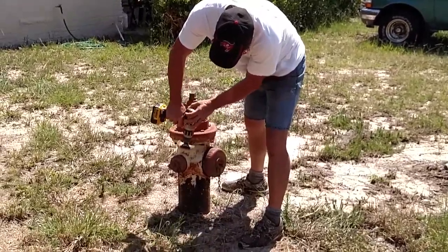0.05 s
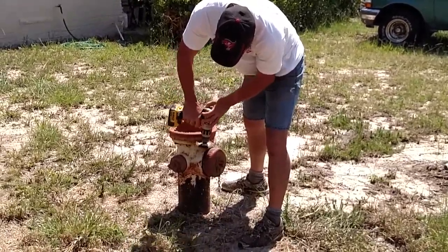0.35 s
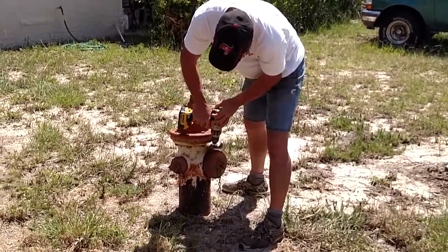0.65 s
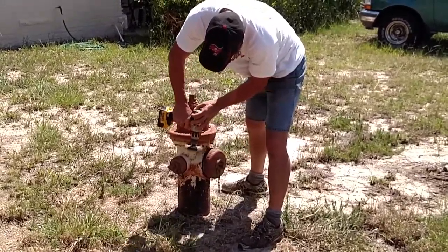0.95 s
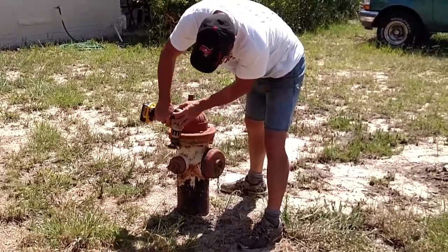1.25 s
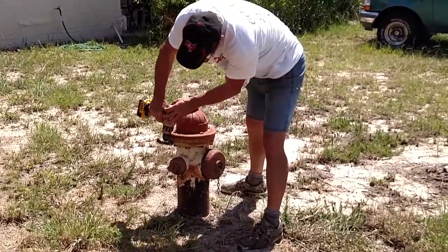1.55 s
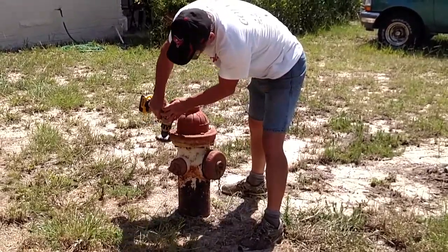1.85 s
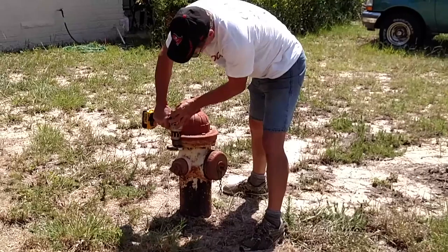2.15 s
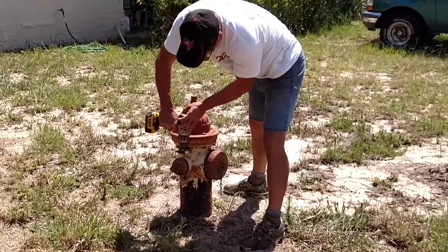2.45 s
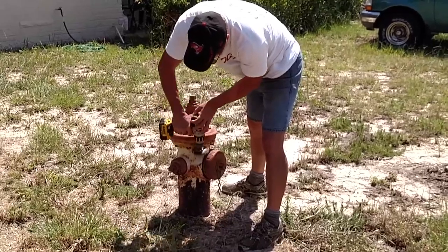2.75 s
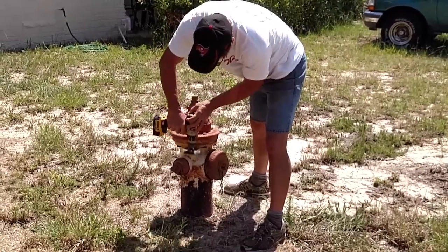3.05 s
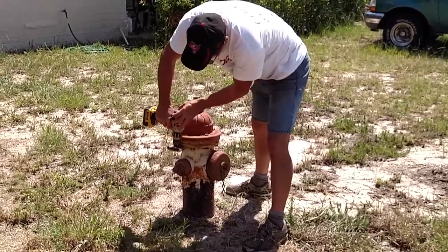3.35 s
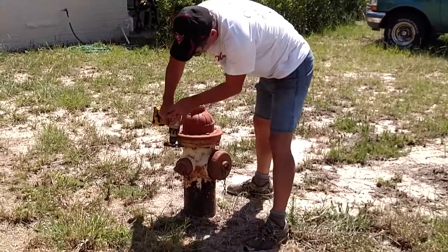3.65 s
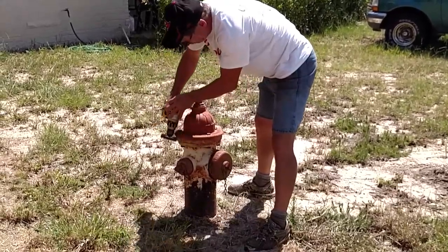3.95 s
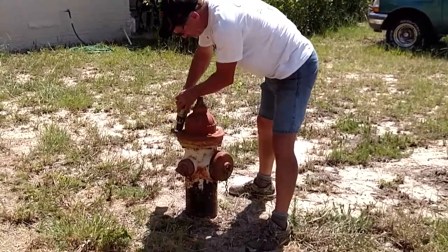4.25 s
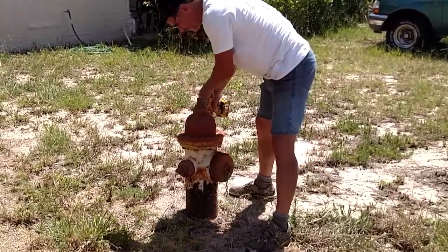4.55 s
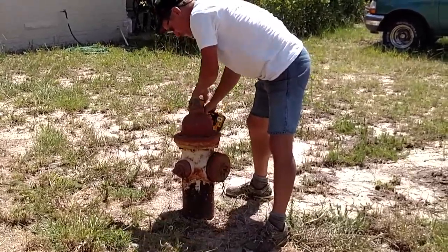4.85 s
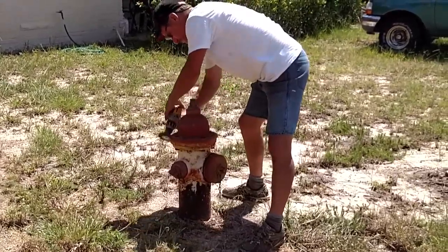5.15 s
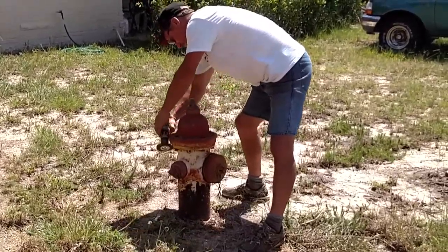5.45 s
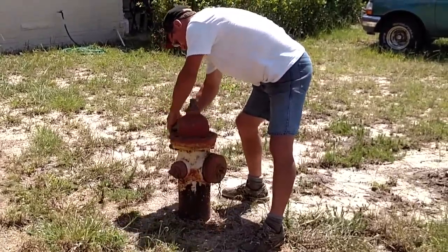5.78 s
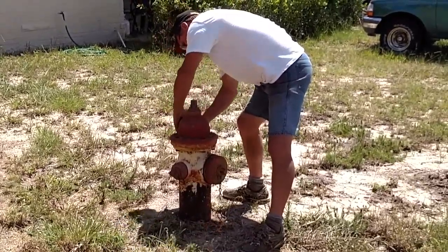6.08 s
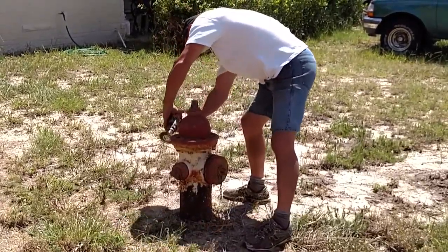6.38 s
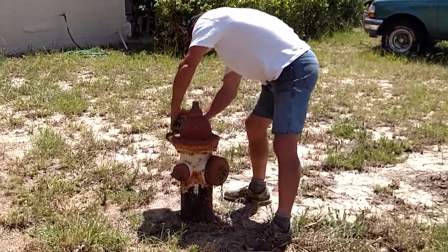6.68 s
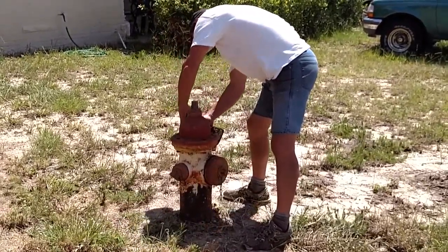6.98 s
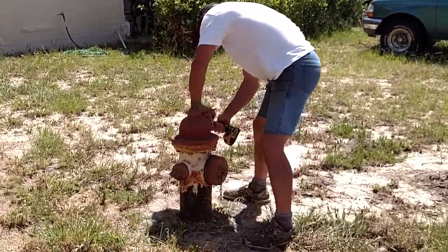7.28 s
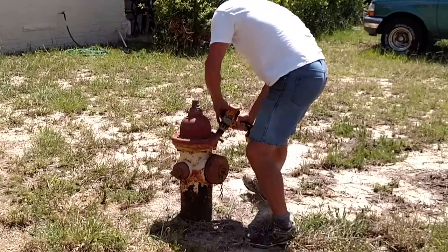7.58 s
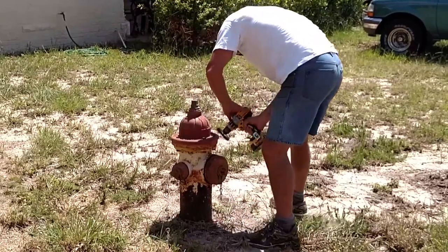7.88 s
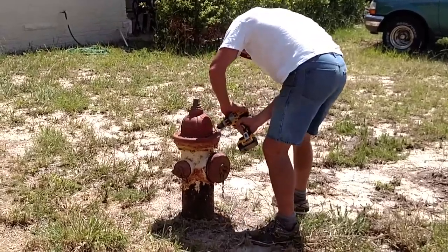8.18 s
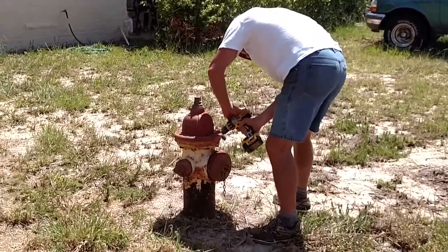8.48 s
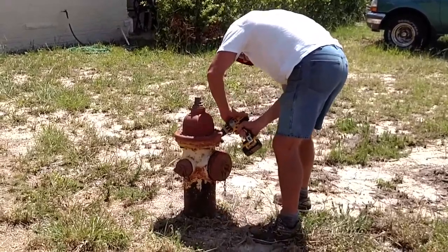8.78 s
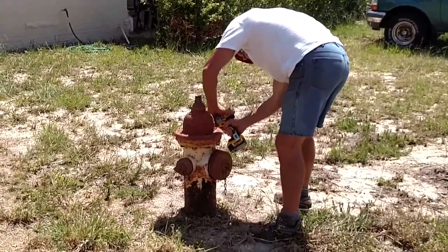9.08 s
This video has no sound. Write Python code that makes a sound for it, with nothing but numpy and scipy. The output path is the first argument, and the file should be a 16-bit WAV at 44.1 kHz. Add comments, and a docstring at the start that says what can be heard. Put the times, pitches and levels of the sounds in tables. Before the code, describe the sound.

Outdoors, a spinning wire brush rasps and hisses on a metal hydrant over a wavering drill whine and gusty wind thumps.

```python
"""On a lawn, one microphone, a few metres from a cordless drill wire-brushing a rusty cast-iron hydrant.
From the start the wires scrub, hiss and sing on the front of the cap; the whine sags under pressure.
Around 2 s the wires squeal twice on an edge, and once more near 4 s. From about 3.5 to 5 s the wind
buffets the microphone hardest, while the brush works round to the back. Near 8 s it moves to the side
and lifts, so the motor speeds up; then it is pressed on again until the end, at about 9 s."""
import sys
import numpy as np
from scipy import signal
from scipy.fft import rfft, irfft, next_fast_len
from scipy.io import wavfile
from scipy.ndimage import uniform_filter1d, map_coordinates

SR = 44100
rng = np.random.default_rng(int(sys.argv[2]) if len(sys.argv) > 2 else 0)


def wrap_up_sound(samples):
    """Save the sound to the file named by the first command line argument, as 16-bit audio."""
    columns = np.atleast_2d(samples).T
    # keep every value between -1 and 1, then stretch to whole-number steps
    tamed = np.clip(columns, -1, 1)
    steps = np.round(tamed * 32767).astype(np.int16)
    wavfile.write(sys.argv[1], SR, steps)


N = 402633

# spectra of still air over the lawn, wind rumble and an eddy's tearing wash: f/Hz, relative level/dB
AIR_SPECTRUM = [(20, 19.5), (100, -19), (250, 0), (500, -2), (1200, -14), (6000, -43)]
RUMBLE_SPECTRUM = [(10, -22), (22, -1), (70, 1.5), (115, -8), (160, -11.5), (250, -24.5), (400, -49),
                   (900, -70)]
TEAR_SPECTRUM = [(60, 1), (150, 7.5), (250, -6.5), (400, -10.5), (620, -26.5), (1500, -32), (4000, -62),
                 (12000, -90)]
# wind rumble at the microphone: t/s, level/dB
WIND_LEVEL = [(0, -32), (.6, -34.5), (1, -42.5), (1.4, -28.5), (1.8, -43.5), (2.05, -31.5), (3.1, -45),
              (3.45, -36), (4.05, -28), (4.3, -37.5), (4.45, -20.5), (4.88, -25), (5.1, -37), (5.8, -37),
              (6.35, -45.5), (6.85, -40.5), (7.2, -26), (7.65, -48), (8.0, -44), (8.55, -53.5),
              (8.85, -33.5), (9.13, -49)]
# the hardest eddies to strike the microphone: t/s, peak level/dB, flutter f/Hz, length/s
HARD_EDDIES = [(.215, -19.5, 134, .015), (.288, -19.5, 118, .023), (.389, -12.5, 114, 0.011),
               (1.256, -22.5, 118, .016), (1.535, -17.5, 120, 0.011), (2.008, -14.5, 133, 0.0071),
               (2.098, -16, 128, 0.019), (2.314, -15, 114, .015), (2.528, -23, 109, 0.019),
               (3.434, -7.5, 127.5, 0.013), (3.628, -18.5, 120, 0.02), (3.669, -11.5, 137, 0.0058),
               (3.87, -17, 126, .019), (3.971, -12, 108, .014), (4.039, -5.5, 165, 0.022),
               (4.092, -2, 153.3, 0.019), (4.249, -16, 134, 0.0094), (4.489, -11.5, 121, .024),
               (4.568, -13, 121, 0.031), (4.677, -10, 159, 0.058), (4.711, -12.5, 178, 0.016),
               (4.808, -15, 107, 0.036), (4.862, -4.5, 149, 0.011), (4.982, -10, 185, 0.02),
               (5.239, -22, 106, .014), (5.292, -16.5, 130, 0.012), (5.645, -19.5, 73, 0.01),
               (5.828, -15, 198, 0.025), (5.865, -17, 137, 0.014), (6.472, -22, 98, 0.0093),
               (7.072, -13, 134, 0.0056), (7.134, -14, 78, 0.013), (7.272, -6, 118, 0.0067),
               (7.488, -20, 120, 0.011)]
# the whine sinks as the brush is pressed on and recovers as it is lifted: t/s, f/Hz
WHINE_PITCH = [(0, 1335), (.5, 1319), (.84, 1366), (1.38, 1277), (1.76, 1366), (1.95, 1332), (2.2, 1412),
               (2.48, 1288), (2.6, 1272), (2.83, 1385), (3.15, 1350), (3.49, 1353), (3.7, 1425),
               (3.93, 1444), (4.2, 1365), (4.49, 1322), (4.64, 1377), (4.8, 1390), (5.02, 1355),
               (5.25, 1365), (5.59, 1359), (5.76, 1298), (5.94, 1379), (6.12, 1343), (6.24, 1435),
               (6.32, 1447), (6.65, 1333), (6.92, 1286), (7.36, 1258), (7.72, 1279), (7.88, 1431),
               (8.12, 1443), (8.23, 1398), (8.39, 1443), (8.5, 1350), (8.6, 1366), (8.73, 1299),
               (9.13, 1296)]
# the drill beams its two tones differently as it is turned: t/s, whine level/dB, octave level/dB
WHINE_LEVELS = [(0, -49, -46.5), (.9, -51.5, -45.5), (1.45, -41.5, -45), (1.95, -49, -38), (2.36, -49, -51),
                (2.58, -43, -37.5), (2.76, -55, -49), (3.45, -49, -54), (3.72, -42, -37.5),
                (4.0, -41.5, -42), (4.25, -53, -55), (4.48, -51, -42), (4.59, -49, -49), (4.76, -55, -39),
                (5.25, -56, -43.5), (5.45, -58, -56), (5.7, -63, -41), (5.9, -51, -48), (6.28, -47, -39),
                (6.48, -63, -44), (6.72, -49, -42), (7.25, -46.5, -52.5), (7.72, -48, -38),
                (8.02, -41.5, -45.5), (8.25, -37, -55), (8.7, -43, -43), (9.13, -45, -47)]
# upper motor and gear lines: multiple of the whine, free-running level over it/dB, full-load change/dB
GEAR_LINES = [(1.81, -25, 19), (3, -20, 2), (3.4, -22, 15), (4.001, -6.5, -8), (5.001, -20, 7),
              (5.753, -12, -4)]
# wires and iron sing where the brush dwells; near 7.6 s, a thin rising whistle from the drill's gears:
# start t/s, end t/s, start f/Hz, end f/Hz, width/Hz, relative level/dB
SINGING_BANDS = [(.2, 1.15, 2135, 2200, 330, -40.5), (0, 1.6, 4350, 4170, 400, -42),
                 (1.1, 1.68, 6500, 6130, 350, -40.5), (1.5, 1.93, 2563, 2470, 400, -37),
                 (1.57, 1.78, 5700, 4960, 600, -34), (1.95, 2.22, 5550, 6400, 350, -40),
                 (2.42, 2.73, 4310, 4330, 250, -37.5), (2.75, 3.15, 4450, 4560, 700, -40.5),
                 (4.78, 6.2, 4570, 4590, 220, -47), (5.3, 5.85, 1900, 2103, 400, -43),
                 (6.9, 7.88, 2100, 2298, 400, -39.5), (7.15, 7.77, 4080, 4230, 300, -38.5),
                 (7.54, 7.8, 4270, 4410, 50, -33.5), (8.1, 8.33, 1650, 1623, 300, -37),
                 (8.38, 9.2, 2300, 2377, 350, -41), (8.4, 9.3, 1753, 1794, 391.2, -37)]
# wires catching on an edge: t/s, length/s, catches a turn, first peak level/dB, start f/Hz, end f/Hz,
# octave over the tone/dB, roughness as a fraction of the pitch
SQUEAL_BOUTS = [(1.579, 0.23, 2, -24, 2650, 2460, -2.5, 0.06), (2.016, 0.15, 2, -29, 2820, 3260, 4, 0.03),
                (3.929, 0.068, 1, -25.5, 2840, 2400, -2.5, 0.09)]
# where the brush works on the cap: t/s, place (0 front, 1 back, 2 and over side)
BRUSH_PLACE = [(0, 0.16), (3.6, 0.13), (5.3, 0.9), (7.75, 0.51), (7.85, 3.9), (8.6, 1.63), (9.13, 1.6)]
# iron and arms screen the brush from the microphone or expose it: t/s, gain/dB, extra tip hiss/dB
BRUSH_EXPOSURE = [(0, 1, -0.5), (.7, 2, -2.3), (1.4, 0.5, 1.5), (2.05, 1.5, 0.5), (2.23, 1, 1),
                  (2.55, 2, 0), (2.74, 0.5, 0), (2.91, 4.5, 0), (3.08, 1.8, 0), (3.4, 2.5, 0.5),
                  (3.75, -2, 2), (4.0, 0.5, 0.5), (4.14, -6, 0), (4.58, -3.5, 1), (4.75, -1.5, 3),
                  (5.1, -1.5, -1.5), (5.55, 0.6, 0), (5.79, 0.5, -2.5), (5.92, -3, 0), (6.28, -1.5, -4),
                  (6.45, -0.5, 3), (7.2, -4, -1), (7.45, -2, 3), (7.75, 0.5, 0.5), (7.9, -2.5, 0),
                  (8.2, 1.5, 0.5), (8.4, 0.5, -4), (8.46, 2, -0.5), (9.13, 0.2, 0.5)]
# spectrum of the iron's rasp on each face of the cap: f/Hz, relative level/dB
IRON_FRONT = [(260, -41), (450, -16), (564, -9), (665, -5), (873, -5), (1210, -7), (1310, -4.5),
              (1590, 0.5), (1680, 1), (1950, -8.5), (2190, -5.5), (2480, -3.5), (2900, -13), (3770, -34),
              (6380, -120)]
IRON_BACK = [(260, -29), (450, -15), (501, -23), (630, -11.5), (782, -9), (949, -3), (1180, -3.5),
             (1270, -1.5), (1380, -5.5), (1900, -1.5), (2500, -3), (3250, -19), (5500, -120)]
IRON_SIDE = [(260, -36), (450, -17), (518, -15), (735, -7.5), (1000, -4.5), (1220, -11), (1270, -3.5),
             (1390, -2.5), (1750, -3.5), (2040, -8.5), (2310, -3.5), (2640, -14), (2900, -12), (3770, -48),
             (6380, -120)]
# spectra of the wires' scrub on each face, and of their tips' hiss: f/Hz, relative level/dB
WIRES_FRONT = [(1710, -39), (2900, -10.5), (3160, -9.5), (3390, -1.5), (3680, -5.5), (4040, 2), (4360, 0.5),
               (5150, -6.5), (6460, -2.5), (7270, -13.5), (8070, -6), (9000, -24), (11700, -41),
               (19800, -120)]
WIRES_BACK = [(1760, -19), (3000, -4), (3180, -8), (3440, 2.5), (3740, -1.5), (4500, 0.5), (4770, -2),
              (5160, -7.5), (6230, -1), (7390, -10.5), (8130, -3), (9000, -17), (11700, -30), (19800, -120)]
WIRES_SIDE = [(1760, -42), (3000, -18), (3100, -10), (3370, -6), (3710, -3.5), (4270, -1), (4750, 2),
              (5140, -9.5), (6030, 1.5), (6770, -7), (7090, -9), (8020, -7), (9000, -8.5), (11700, -17),
              (19800, -120)]
TIP_SPECTRUM = [(5180, -6.5), (8800, -2), (10700, -6), (11800, -3), (13400, -7.5), (14900, -4),
                (15500, -10)]

FREE_HZ, FULL_LOAD_HZ = 1445, 1252  # whine running free and pressed hardest
WHINE_PER_TURN = 44  # cycles of whine in one turn of the brush


def amp(db):
    """Decibels to gain."""
    return 10 ** (np.asarray(db) / 20)


def unit(x):
    """Scale to rms 1."""
    return x / np.sqrt(np.mean(x ** 2) + 1e-20)


def curves(rows):
    """One value per sample for each column after the time."""
    times, *columns = np.transpose(rows)
    return [np.interp(np.arange(N) / SR, times, column) for column in columns]


def wobble(rate, size=N):
    """A smooth random curve, rate knots a second."""
    knots = rng.standard_normal(int(size * rate / SR) + 4)
    return map_coordinates(knots, [np.arange(size) * rate / SR])


def angle(hz):
    """Running phase of a changing frequency."""
    return 2 * np.pi * np.cumsum(hz) / SR


def filtered(x, response):
    """Filter x by a gain given as a function of frequency."""
    size = next_fast_len(N + 8192)
    return irfft(rfft(x, size) * response(np.fft.rfftfreq(size, 1 / SR)), size)[:N]


def coloured(x, spectrum):
    """Shape x by rows of f/Hz, level/dB, and scale to rms 1."""
    f, db = np.transpose(spectrum)
    return unit(filtered(x, lambda hz: amp(np.interp(np.log(hz + 1), np.log(f + 1), db))))


def add(track, start, sound):
    """Mix a sound into the track from start, in seconds."""
    at = round(start * SR) + np.arange(len(sound))
    inside = (at >= 0) & (at < N)
    track[at[inside]] += sound[inside]


def still_air(level_db=-49.5):
    """The low, steady hush of open air over the lawn."""
    return amp(level_db) * coloured(rng.standard_normal(N), AIR_SPECTRUM)


def small_eddies(rumble_db, per_s=9, over_rumble_db=9.5, flutter_hz=109, length_s=.015):
    """Weak eddies come at random, following the wind of the moment: rows like HARD_EDDIES."""
    count = int(per_s * N / SR)
    times = (np.arange(count) + rng.uniform(0, 1, count)) / per_s
    return [(s, rumble_db[int(s * SR)] + over_rumble_db, flutter_hz, length_s) for s in times]


def wind(lumpy_db=4, ragged=.45, shake_db=1.5, suction=.26, tear_db=-9, tear_hz=172.5):
    """Wind on the microphone: a lumpy rumble, and eddies that shake the diaphragm for a few cycles."""
    rumble_db, = curves(WIND_LEVEL)
    breeze = amp(rumble_db) * unit(amp(lumpy_db * wobble(25)))
    rumble = coloured(rng.standard_normal(N), RUMBLE_SPECTRUM)
    wash = coloured(rng.standard_normal(N), TEAR_SPECTRUM)
    eddies, force = np.zeros((2, N))
    t = np.arange(-SR // 16, SR // 16) / SR
    for centre, db, hz, length in list(HARD_EDDIES) + small_eddies(rumble_db):
        phase = angle(hz * np.exp(ragged * np.tanh(wobble(300.4, len(t)))))
        flutter = -np.cos(phase - phase[len(t) // 2])  # pressure is lowest at the eddy's core
        push = amp(db) / (1 + (2 * t / length) ** 2) * np.hanning(len(t))
        shake = amp(shake_db * np.tanh(wobble(197.2, len(t))))
        add(eddies, centre + t[0], push * flutter * shake)
        add(force, centre + t[0], push * (hz / tear_hz) ** 3)  # quick eddies tear the most
    tearing = amp(tear_db) * (force + .5 * breeze) * wash
    # eddies pull on the diaphragm more than they push
    return breeze * rumble + eddies - suction * eddies ** 2 + tearing


def motor(pitch, load, flutter=.00116, flicker_db=2.06):
    """The whine and its octave, with gear lines that change strength as the load drags the speed down."""
    whine_db, octave_db = curves(WHINE_LEVELS)
    phase = angle(pitch * (1 + flutter * wobble(50)))  # the rotor runs slightly unevenly
    gears = [(multiple, whine_db + db + load_db * load) for multiple, db, load_db in GEAR_LINES]
    return sum(np.sqrt(2) * amp(db + flicker_db * wobble(30)) * np.sin(multiple * phase)
               for multiple, db in gears + [(1, whine_db), (2, octave_db)])


def singing(turn, fade_s=.11, lift_db=3, swing_db=1):
    """Wire and iron resonances drift with the contact point, a gear whistles; all swell twice a turn."""
    out = np.zeros(N)
    for start, end, start_hz, end_hz, width_hz, db in SINGING_BANDS:
        size = int((end - start) * SR)
        t = np.arange(size) / SR
        pole = np.exp(-np.pi * width_hz / SR)
        noise = rng.standard_normal((2, 2 * SR))
        real, imag = signal.lfilter([1], np.poly([pole, pole]), noise)[:, :size]
        phase = angle(np.linspace(start_hz, end_hz, size))
        band = unit(real * np.cos(phase) + imag * np.sin(phase))
        swell = np.clip(np.minimum(t, t[-1] - t) / fade_s, 0, 1)
        add(out, start, amp(db + lift_db) * swell * band)
    return out * amp(swing_db * np.sin(2 * turn))


def squeals(pitch, rise_s=.0017, detune=.026, scatter_db=2, jitter_s=.002, build_db=3):
    """Wires catch on an edge in step with the turning; each catch is a short, rough stick-slip tone."""
    out = np.zeros(N)
    t = np.arange(SR // 30) / SR
    envelope = t / rise_s * np.exp(1 - t / rise_s)
    for start, length, per_turn, db, start_hz, end_hz, octave_db, rough in SQUEAL_BOUTS:
        gap = WHINE_PER_TURN / pitch[int(start * SR)] / per_turn
        for after in np.arange(0, length, gap):
            sharp, strong, late = rng.standard_normal(3)
            hz = np.interp(after, [0, length], [start_hz, end_hz]) * (1 + detune * sharp)
            phase = angle(hz * (1 + rough * wobble(1320, len(t))))
            tone = np.sin(phase) + amp(octave_db) * np.sin(2 * phase)
            peak_db = db + build_db * after / length + scatter_db * np.tanh(strong)  # the wires dig in
            add(out, start + after + jitter_s * late, amp(peak_db) * envelope * tone)
    return out


def scratches(turn, spread, swing_db):
    """Countless wire tips flick the rust, bunched once and twice in each turn of the uneven brush."""
    flicks = rng.standard_normal(N) * np.exp(spread * wobble(3000))
    return flicks * amp(swing_db * (np.sin(turn) + np.sin(2 * turn)))


def on_cap(x, place, spectra):
    """Each face of the iron cap colours the scraping; they blend as the brush travels round."""
    return sum(np.clip(1 - abs(place - face), 0, 1) * coloured(x, spectrum)
               for face, spectrum in enumerate(spectra))


def wire_modes(x, depth_db=1.98):
    """The many wires ring in narrow bands that slowly swap as the brush is tilted."""
    bands = signal.stft(x, nperseg=1024)[2]
    ripple = uniform_filter1d(rng.standard_normal(bands.shape), size=4, axis=0)  # across frequency
    ripple = uniform_filter1d(ripple, size=70, axis=1)  # along time
    return signal.istft(bands * amp(depth_db * unit(ripple)), nperseg=1024)[1][:N]


def brush(turn, load, sway_db=.5, judder_db=.5):
    """Scratches heard as the iron's rasp, the wires' scrub and the tips' hiss; all grow with pressure."""
    exposure_db, tips_db = curves(BRUSH_EXPOSURE)
    place = np.clip(curves(BRUSH_PLACE)[0], 0, 2)
    press = load ** .55  # scraping grows fastest at first touch
    rasp_db = -37.5 + 2 * press + np.clip(place - 1, 0, 1)  # a decibel louder at the cap's side
    scrub_db = -40.5 + 10 * press
    hiss_db = -44 + 5.5 * press + tips_db
    rasp = on_cap(scratches(turn, spread=.3, swing_db=-.64), place, (IRON_FRONT, IRON_BACK, IRON_SIDE))
    scrub = on_cap(scratches(turn, spread=.23, swing_db=-.2), place,
                   (WIRES_FRONT, WIRES_BACK, WIRES_SIDE))
    hiss = coloured(scratches(turn, spread=.14, swing_db=.3), TIP_SPECTRUM)
    wires = wire_modes(amp(scrub_db) * scrub + amp(hiss_db) * hiss)
    gain = amp(exposure_db + sway_db * wobble(9) + judder_db * wobble(45))
    return gain * (amp(rasp_db) * rasp + wires)


def with_ground_bounce(x, load, lifted_ms=1.403, shorten_ms=.18, gain=.17, cutoff_hz=4500):
    """The direct sound plus a dull bounce off the lawn, which comes sooner with the tool pressed down."""
    delay_ms = lifted_ms - shorten_ms * load
    bounce = map_coordinates(x, [np.arange(N) - delay_ms * SR / 1000], order=1)
    return x + gain * filtered(bounce, lambda hz: 1 / (1 + (hz / cutoff_hz) ** 2))


def scene():
    """The load that slows the motor also drives the scraping; one microphone feeds both channels."""
    pitch, = curves(WHINE_PITCH)
    load = np.clip((FREE_HZ - pitch) / (FREE_HZ - FULL_LOAD_HZ), 0, None)
    turn = angle(pitch / WHINE_PER_TURN)
    air = still_air()
    drill = motor(pitch, load) + with_ground_bounce(brush(turn, load), load) + singing(turn)
    mono = air + wind() + drill + squeals(pitch)
    return np.array([mono, mono])


def record(dry):
    """The recorder clips at full scale and keeps nothing above 15550 Hz."""
    return np.array([filtered(channel, lambda hz: hz < 15550) for channel in np.clip(dry, -1, 1)])


dry = scene()
out = record(dry)
wrap_up_sound(out)
```